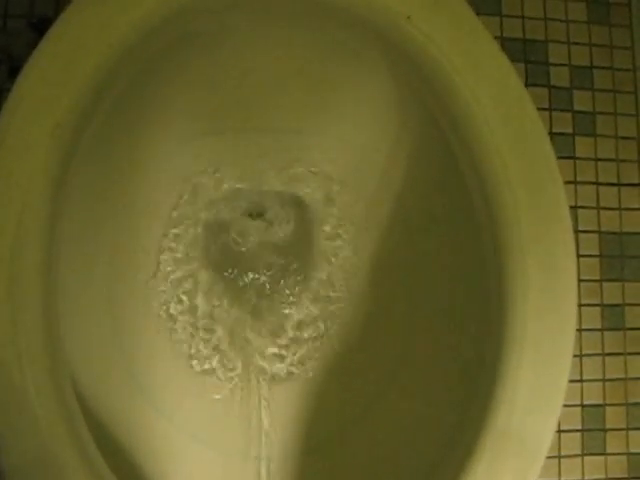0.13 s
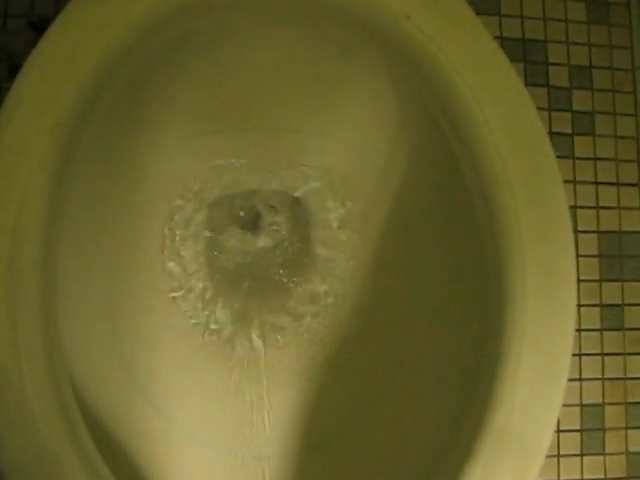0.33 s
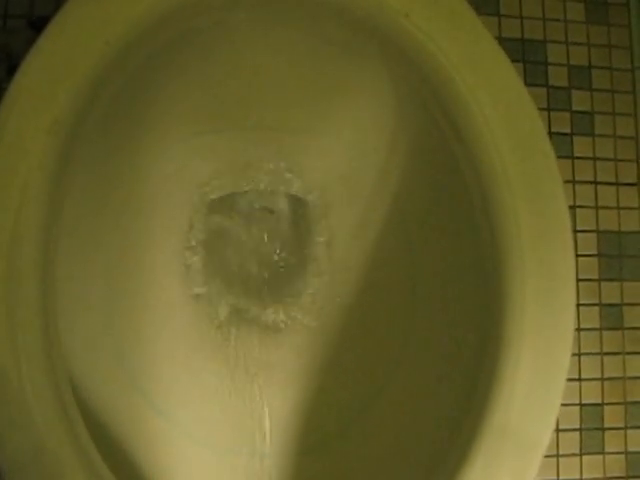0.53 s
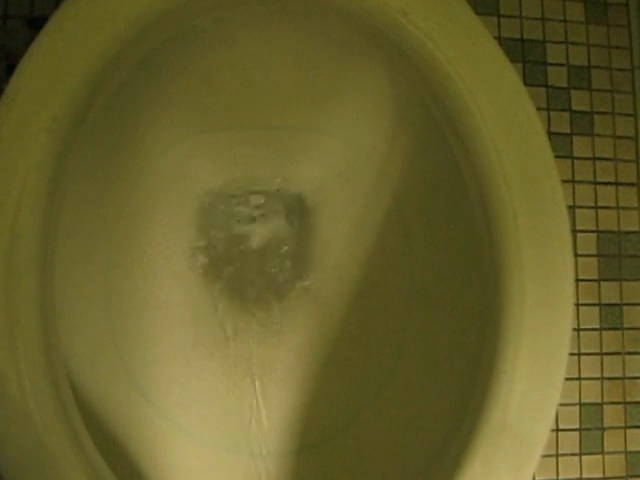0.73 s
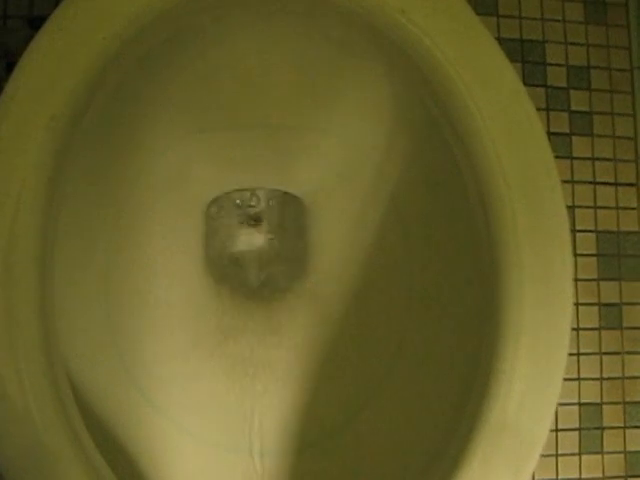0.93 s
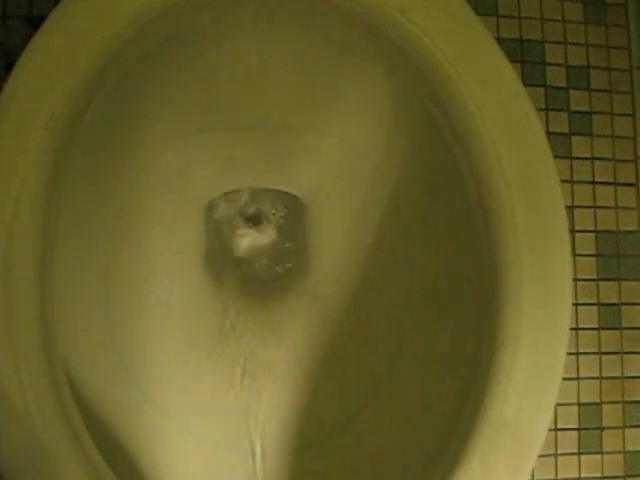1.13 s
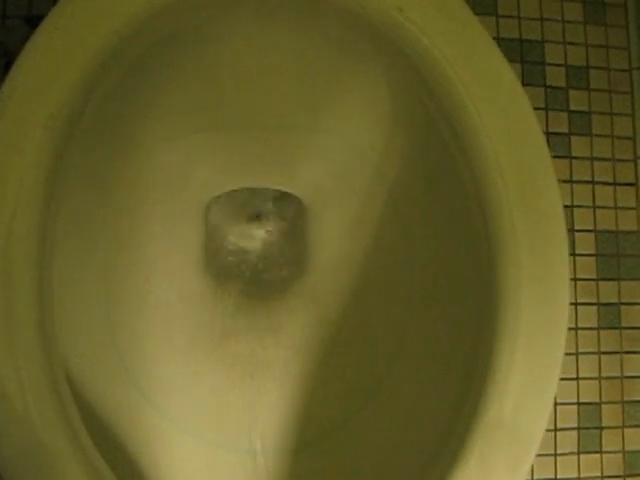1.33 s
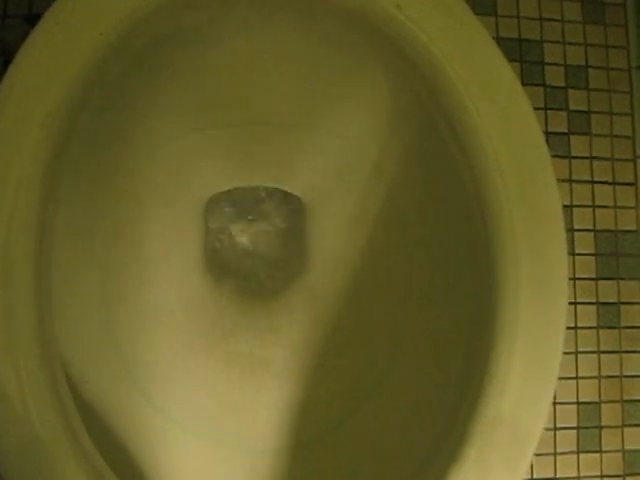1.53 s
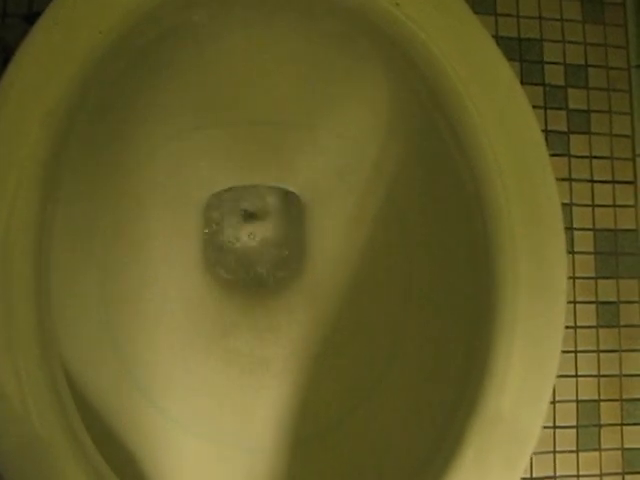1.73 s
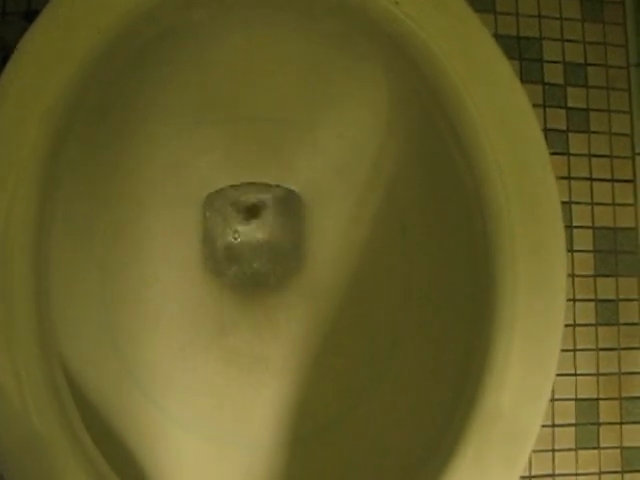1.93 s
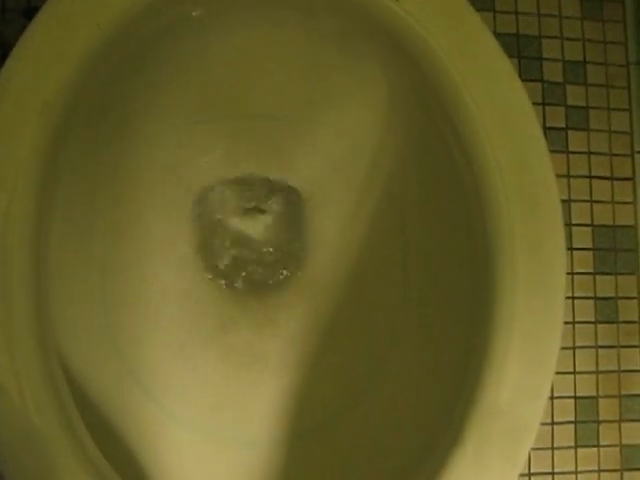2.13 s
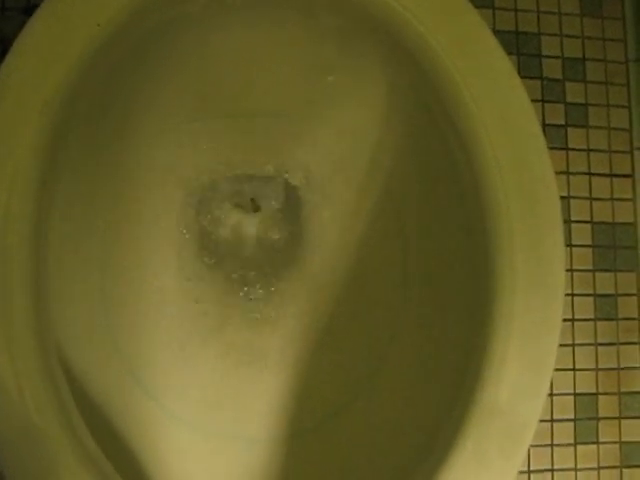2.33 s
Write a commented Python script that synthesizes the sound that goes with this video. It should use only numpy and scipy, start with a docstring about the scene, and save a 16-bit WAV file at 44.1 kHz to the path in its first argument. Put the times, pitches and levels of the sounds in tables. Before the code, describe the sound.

Toilet water rushes down the bowl, then glugs and slurps in a small bathroom.

```python
"""A toilet flushes in a small tiled bathroom. Water sheets down the bowl and thins out while the drain
rumbles. Then the siphon sucks air: big gulps and slurping sprays break out of the trap and ring the room.
Each bubble or air pocket is a damped, gliding sine; the flow is coloured noise mixed with many bubbles.
The bowl falls quiet, leaving a burble in the hollow rim and the hiss of the refill valve."""
import sys
import numpy as np
from scipy import signal
from scipy.fft import rfft, irfft, next_fast_len
from scipy.io import wavfile
from scipy.ndimage import map_coordinates

SR = 44100
rng = np.random.default_rng(int(sys.argv[2]) if len(sys.argv) > 2 else 0)


def bounce(signal):
    """Save signal as a 16-bit WAV file at the path given by the first command-line argument."""
    frames = np.transpose(np.atleast_2d(signal))
    limited = np.clip(frames, -1, 1)
    pcm = np.round(limited * 32767).astype(np.int16)
    wavfile.write(sys.argv[1], SR, pcm)


N = 109853
T = np.arange(N) / SR

# valve hiss: freq_hz, gain_db
HISS_COLOUR = [(60, -12.5), (110, -4.5), (250, 10.5), (450, -14.5), (900, -14.5), (1500, -8.5),
               (3300, -11.5), (4500, -14.5), (6000, -30.5), (7000, -20.5)]
# flow down the drain: time_s, level_db
DRAIN_LEVEL = [(0, -47), (.25, -43.5), (.35, -45), (.62, -46), (.72, -39.5), (.82, -38.5), (.9, -50.5),
               (.98, -46.5), (1.06, -36), (1.18, -37.5), (1.34, -52), (1.48, -40.5), (1.62, -46.5),
               (1.86, -43), (1.97, -49), (2.49, -51.5)]
# drain pipe resonances: freq_hz, width_hz, gain_db
PIPE_MODES = [(60, 6, 1), (86, 7, 2), (110, 8, -1), (190, 24, -14)]
# water column dropping after big gulps: start_s, level_db
DRAIN_THUDS = [(1.28, -20), (1.909, -31)]
# trickle in the rim: time_s, level_db
RIM_LEVEL = [(0, -43.5), (.6, -43), (.8, -45.5), (1.15, -38), (2.1, -57.5), (2.49, -50)]
# rim cavity resonances: freq_hz, width_hz, gain_db
RIM_MODES = [(895.4, 24, 5), (950, 40, 3), (1290, 42, 2)]
# air burbling in the rim: start_s, pitch_hz, level_db, t60_s
RIM_BURBLES = [(0.055, 333.2, -32, 0.34), (.218, 892, -26, 0.11), (0.333, 1284, -17.5, 0.087),
               (.342, 900, -42, 0.13), (.42, 924, -28.5, 0.11), (.478, 875, -15.5, 0.026),
               (0.566, 1300, -22, 0.064), (.67, 948, -31.5, 0.28), (.96, 958, -19.5, 0.036),
               (1.06, 915, -23, 0.14), (2.146, 916, -25, 0.059), (2.228, 915, -31, 0.18),
               (2.385, 934, -27, 0.055), (2.41, 908, -31, 0.041)]
# water running down the bowl: time_s, relative_db
WASH_LEVEL = [(0, -32), (.14, -34.5), (.3, -32.5), (.4, -36.5), (.54, -36), (.58, -35), (.75, -38.5),
              (.85, -37.5), (1.1, -36), (1.2, -35.5), (1.32, -39.5), (2.0, -41.5), (2.15, -46.5),
              (2.3, -48.5), (2.49, -52)]
# water sheet: freq_hz, gain_db
SHEET_COLOUR = [(88, -61.5), (150, -40.5), (182, 1), (250, -4), (334, -5.5), (475, -7), (819, -10),
                (916, -1.5), (1080, -11.5), (1280, -8.5), (1820, -14), (2360, -4.5), (5000, -19),
                (6060, -31.5), (6890, -36.5), (8960, -65.5), (15200, -120)]
# droplets: freq_hz, gain_db
DROP_COLOUR = [(1500, -37.5), (3000, 1.5), (4800, 4.5), (6000, 1), (7000, -28)]
# spray on the porcelain: freq_hz, gain_db
SPRAY_COLOUR = [(1500, -24), (2500, 2), (3400, -8), (4500, -1.5), (5500, -8.5), (7000, -14)]
# single bubbles in the funnel: start_s, pitch_hz, level_db, t60_s
PLINKS = [(.895, 2294, -24.5, 0.047), (.938, 2040, -31.5, 0.041), (.95, 590, -27, 0.027),
          (.966, 2135, -21, 0.064), (.977, 2290, -25.5, 0.19), (.99, 384, -32.5, 0.069),
          (1.028, 670, -30.5, 0.27), (1.055, 1754, -28.5, .1), (1.32, 2750, -34.5, 0.018),
          (1.455, 2570, -7, 0.0072), (1.474, 2620, -20, 0.028), (1.569, 2550, -25, 0.032),
          (1.64, 2510, -20.5, 0.038), (1.767, 2640, -24.5, 0.047), (1.877, 2594, -17, 0.032),
          (1.907, 2620, -21, 0.021), (1.938, 2600, -20.5, 0.05), (2.172, 2853, -22, 0.022)]
# air and water churning in the trap: time_s, relative_db
CHURN_LEVEL = [(0, -73.5), (.85, -86), (1.0, -46), (1.15, -45), (1.26, -30.5), (1.32, -51.5), (1.37, -27),
               (1.4, -32), (1.45, -26), (1.6, -29), (1.7, -30.5), (1.79, -28.5), (1.88, -27), (1.96, -31),
               (2.0, -27.5), (2.08, -40), (2.3, -50), (2.49, -50.5)]
# foam in the trap: freq_hz, gain_db
FOAM_COLOUR = [(100, -47.5), (190, -14.5), (250, -9), (430, -2), (520, -8), (1200, -9), (1600, -16.5),
               (2000, -14.5), (2550, -17.5), (4100, -20), (5500, -32), (7000, -72.5)]
# showers of small bubbles: start_s, pitch_hz, relative_db, nominal_length_s
SLURPS = [(0.132, 4320, -31, .012), (0.149, 2700, -29.5, 0.0072), (0.37, 4780, -32, 0.0045),
          (.49, 5170, -34.5, 0.0032), (0.563, 5200, -43, 0.0064), (0.792, 5100, -39.5, 0.0044),
          (0.841, 4200, -32, .01), (0.895, 3300, -35, 0.02), (0.974, 3540, -30.5, 0.015),
          (1.093, 3610, -31, 0.0091), (1.154, 4760, -30, 0.0046), (1.164, 2560, -28.5, 0.0071),
          (1.184, 2090, -29, 0.021), (1.185, 4310, -29.5, 0.011), (1.187, 1376, -26.5, 0.03),
          (1.226, 3150, -26, .012), (1.223, 1440, -25, 0.0071), (1.259, 3400, -21.5, 0.0096),
          (1.271, 3670, -23.5, 0.0063), (1.278, 4900, -21, 0.0022), (1.349, 2780, -33.5, .015),
          (1.38, 3320, -17, 0.0044), (1.429, 3354, -26, 0.014), (1.514, 2740, -28, 0.0049),
          (1.587, 2700, -26, 0.017), (1.59, 4360, -24, 0.015), (1.714, 3740, -30.5, 0.0055),
          (1.733, 3700, -26.5, 0.012), (1.768, 5340, -23, 0.0017), (1.816, 3960, -31, 0.024),
          (1.856, 3650, -25, 0.0061), (1.929, 3230, -26.5, 0.015), (1.985, 3180, -30, 0.015),
          (2.029, 3040, -36.5, 0.018), (2.16, 2880, -33, .022)]
# large air pockets in the trap: start_s, pitch_hz, level_db, t60_s, sag_fraction
GULPS = [(1.242, 763, -19.5, 0.061, 0.38), (1.263, 1123, -16.5, 0.072, .25), (1.266, 421, -17, 0.071, 0.13),
         (1.274, 568, -13, 0.033, 1), (1.281, 400.2, -11, 0.12, 0.16), (1.299, 342, -11, 0.069, .25),
         (1.333, 374, -13, .025, .2), (1.346, 1000, -14.5, 0.035, .5), (1.351, 420, -14.5, 0.022, .3),
         (1.375, 750, -14, 0.025, .3), (1.378, 330, -17, 0.025, .2), (1.409, 640, -12.5, 0.036, .6),
         (1.409, 1210, -16, .018, .2), (1.421, 1020, -15, .016, .2), (1.435, 438, -25, 0.046, 0.069),
         (1.445, 890, -12, 0.016, 0.22), (1.494, 435, -14, 0.073, 0.2), (1.494, 1246, -16.5, 0.072, .15),
         (1.522, 514, -14, 0.016, .3), (1.526, 1210, -5, 0.021, 0.2), (1.539, 1260, -12.5, 0.021, .2),
         (1.573, 600, -5.5, 0.016, .7), (1.580, 440, -8, 0.014, .6), (1.590, 320, -19, 0.05, .2),
         (1.594, 1170, -13, 0.036, .1), (1.647, 357, -20, .025, .3), (1.672, 1200, -22, .06, .1),
         (1.686, 414, -15, .02, .5), (1.722, 800, -20, .02, .3), (1.735, 620, -17, 0.04, .3),
         (1.76, 1046, -27.5, .04, 0.18), (1.788, 770, -22.5, 0.034, 0.17), (1.811, 1197, -14, 0.045, 0.14),
         (1.831, 457, -11.5, 0.038, 0.41), (1.854, 447, -12.5, 0.031, 1), (1.861, 272, -13.5, 0.037, .2),
         (1.884, 963, -21, 0.019, 0.12), (1.897, 613, -15, 0.06, 0.22), (1.901, 373, -26, 0.047, 0.19),
         (1.914, 419, -7.5, 0.022, 1), (1.919, 251, -20.5, 0.041, 0.068), (1.983, 320, -14, 0.023, 0.41),
         (1.998, 328, -20.5, 0.018, 1)]
# hollows of the bowl: freq_hz, width_hz, gain_db
BOWL_MODES = [(1160, 23, -18), (2466, 20, 5), (2670, 26, -1)]
# standing waves of the room: freq_hz, width_hz, gain_db
ROOM_MODES = [(258, 8, 4.5), (321, 11, 3), (372, 9, -5), (420, 12, 2.5), (541, 10, -6), (596, 11, -4),
              (646, 11, -3), (730, 11, -8), (759, 11, -6), (858, 11, -8), (941, 13, -5)]
# room decay: freq_hz, t60_s
ROOM_DECAY = [(200, 1), (1000, 0.19), (6000, 0.12)]


def amp(db):
    """Gain of a level in dB."""
    return 10 ** (np.asarray(db) / 20)


def along(points, hz):
    """Interpolate (freq_hz, value) rows on a log axis."""
    freqs_hz, values = np.transpose(points)
    return np.interp(np.log(hz + 1), np.log(freqs_hz + 1), values)


def unit(x):
    """x at rms 1."""
    return x / np.sqrt(np.mean(x ** 2) + 1e-20)


def level(rows):
    """Gain per sample from (time_s, level_db) rows."""
    return amp(np.interp(T, *np.transpose(rows)))


def wobble(rate_hz):
    """Smooth random curve with knots at rate_hz."""
    return map_coordinates(rng.standard_normal(4096), [T * rate_hz], mode="wrap")


def filtered(x, response):
    """x through a frequency response."""
    size = next_fast_len(N + SR // 2)
    return irfft(rfft(x, size) * response(np.fft.rfftfreq(size, 1 / SR)), size)[:N]


def coloured(x, points):
    """x shaped by (freq_hz, gain_db) rows, at rms 1."""
    return unit(filtered(x, lambda f: amp(along(points, f))))


def resonate(x, modes):
    """x through parallel resonances."""
    return filtered(x, lambda f: sum(amp(db) * 1j * f * width_hz / (hz * hz - f * f + 1j * f * width_hz)
                                     for hz, width_hz, db in modes))


def bubbles(starts_s, hz, gains, t60_cycles, rise):
    """Small bubbles: damped sines that rise in pitch as they die."""
    offsets = np.arange(900)
    t = offsets / SR
    age = t * hz[:, None] / t60_cycles
    phase = 2 * np.pi * hz[:, None] * t * (1 + rise * np.minimum(age, 1) / 2)
    rings = gains[:, None] * amp(-60 * age) * np.sin(phase)
    indices = np.round(starts_s * SR).astype(int)[:, None] + offsets
    return np.bincount(indices.ravel(), rings.ravel(), N)[:N]


def froth(low_hz, high_hz, t60_cycles, spread_db, count):
    """Steady stream of bubbles of mixed sizes, at rms 1."""
    when, pitch, bulk = rng.random((count, 3)).T
    hz = low_hz * (high_hz / low_hz) ** pitch
    scatter_db = -spread_db * np.log(np.clip(bulk, .02, 1))
    gains = hz / high_hz * amp(scatter_db) * rng.choice([-1, 1], count)
    return unit(bubbles(when * N / SR, hz, gains, t60_cycles, rise=0.085))


def pocket(hz, t60_s, attack_s, sag, waver):
    """One air pocket rings; its pitch wavers and sinks as it swells."""
    t = T[:SR // 5]
    pitch_hz = hz * (1 + sag * (np.exp(-5 * t / t60_s) - .5) + waver * wobble(205)[:len(t)])
    envelope = amp(-60 * t / t60_s) * (1 - np.exp(-t / attack_s))
    return envelope * np.sin(2 * np.pi * np.cumsum(pitch_hz) / SR)


def add(out, start_s, x):
    """Mix x into out at start_s."""
    i = max(0, round(start_s * SR))
    out[i:i + len(x)] += x[:max(0, N - i)]


def refill():
    """The valve hisses, with a thin, wavering whistle."""
    whistle_hz = 4290 + 28 * wobble(140)
    whistle = unit(np.sin(2 * np.pi * np.cumsum(whistle_hz) / SR))
    hiss = coloured(rng.standard_normal(N), HISS_COLOUR)
    return amp(-51.5) * hiss + amp(-56.3) * whistle


def drain():
    """The falling water column booms in the pipe and thuds when it breaks."""
    flow = coloured(rng.standard_normal(N), [(20, -32.5), (55, 9), (200, 7), (500, -15)])
    out = level(DRAIN_LEVEL) * unit(resonate(flow, PIPE_MODES))
    for start_s, db in DRAIN_THUDS:
        add(out, start_s, amp(db) * pocket(hz=48, t60_s=0.04, attack_s=0.0065, sag=.1, waver=0.038))
    return out


def rim():
    """The hollow rim sings with its trickle and burbles now and then."""
    trickle = amp(3.5 * wobble(30)) * rng.standard_normal(N)
    out = level(RIM_LEVEL) * unit(resonate(trickle, RIM_MODES))
    for start_s, hz, db, t60_s in RIM_BURBLES:
        ring = pocket(hz, t60_s, attack_s=0.0052, sag=0.0073, waver=.025)
        flutter_db = 2.5 * wobble(160)[:len(ring)]
        add(out, start_s, amp(db + flutter_db) * ring)
    return out


def spatter():
    """At full flow the sheet breaks into quick bursts of fine spray."""
    fade_s = 0.38
    spray = coloured(froth(1980, 6360, t60_cycles=8.6, spread_db=3, count=4500), SPRAY_COLOUR)
    bursts = amp(2.7 * wobble(110))
    return amp(-37.5) * np.exp(-(T / fade_s) ** 2) * unit(bursts * spray)


def wash():
    """Water sheets over the porcelain: hiss, fine fizz and bright droplets."""
    fizz = froth(507, 7100, t60_cycles=14.6, spread_db=-0.5, count=4000)
    sheet = coloured(fizz + amp(6) * rng.standard_normal(N), SHEET_COLOUR)
    droplets = coloured(froth(3404, 6210, t60_cycles=49, spread_db=4, count=1300), DROP_COLOUR)
    flutter_db = wobble(45)
    return amp(flutter_db - 0.5) * level(WASH_LEVEL) * (sheet + amp(-12) * droplets)


def plinks():
    """Single bubbles pop at the surface and ring."""
    out = np.zeros(N)
    for start_s, hz, db, t60_s in PLINKS:
        add(out, start_s, amp(db) * pocket(hz, t60_s, attack_s=.001, sag=0.007, waver=.025))
    return out


def churn():
    """Air torn into the trap foams in quick, uneven spurts."""
    foam = froth(218.2, 7380, t60_cycles=25, spread_db=3.5, count=3500)
    spurts = amp(2.2 * wobble(120))
    seething = coloured(foam + amp(-0.5) * rng.standard_normal(N), FOAM_COLOUR)
    return amp(-1) * level(CHURN_LEVEL) * unit(spurts * seething)


def slurps(count=32):
    """Each slurp is a short shower of bubbles of about one size."""
    out = np.zeros(N)
    for start_s, hz, db, length_s in SLURPS:
        delays_s = 0.57 * length_s * rng.gamma(2, .5, count)
        pitches_hz = hz * np.exp(0.085 * rng.standard_normal(count))
        gains = amp(2 * rng.standard_normal(count))
        shower = bubbles(delays_s, pitches_hz, gains, t60_cycles=59, rise=0.0094)
        rms = np.sqrt(np.sum(shower ** 2) / (length_s * SR))
        add(out, start_s, amp(db - 3) * shower / rms)
    return out


def gulps(slap_db=-15, slap_t60_s=.025):
    """The siphon breaks: each air pocket rings and water slaps shut behind it."""
    out, t = np.zeros(N), T[:SR // 5]
    slap_colour = [(100, -20.5), (280, 11.5), (1200, 8.5), (1800, -3), (4000, -2), (7000, -19.5)]
    noise = coloured(rng.standard_normal(N), slap_colour)
    for start_s, hz, db, t60_s, sag in GULPS:
        slap = amp(slap_db - 60 * t / slap_t60_s) * np.roll(noise, -round(start_s * SR))[:len(t)]
        ring = pocket(hz, t60_s, attack_s=.0009, sag=sag, waver=.045)
        add(out, start_s, amp(db) * (ring + slap))
    return out


def bathroom(x):
    """Tiled walls add low standing waves and a short diffuse tail above them."""
    hz, t, spectra = signal.stft(rng.standard_normal(SR // 2), SR, nperseg=256)
    decay = amp(-60 * t / along(ROOM_DECAY, hz)[:, None])
    tail = signal.istft(spectra * decay, SR, nperseg=256)[1]
    impulse = np.pad(tail, (SR // 200, 0)) / np.linalg.norm(tail)  # 5 ms predelay
    wet = signal.fftconvolve(x, impulse)[:N]
    diffuse = filtered(wet, lambda f: amp(along([(400, -10.5), (1000, 0)], f)))
    return x + amp(-8.5) * diffuse + amp(3.5) * resonate(x, ROOM_MODES)


def scene(trap_cut_hz=169):
    """The flush from above the bowl, which colours the sound of the trap."""
    highpass = signal.butter(3, trap_cut_hz, "high", fs=SR, output="sos")  # the trap radiates little bass
    trap = signal.sosfilt(highpass, churn() + gulps() + slurps() + plinks())
    bowl = wash() + spatter() + rim() + trap + resonate(trap, BOWL_MODES)
    return (bathroom(bowl) + drain() + refill())[None]


def record(dry):
    """A small microphone: early treble roll-off, then a steep cut."""
    rolloff, cut_hz = [(5000, 0), (6200, -3), (7000, -15)], 7000
    return filtered(dry[0], lambda f: amp(along(rolloff, f)) / np.sqrt(1 + (f / cut_hz) ** 120))[None]


dry = scene()
out = record(dry)
bounce(out)
```